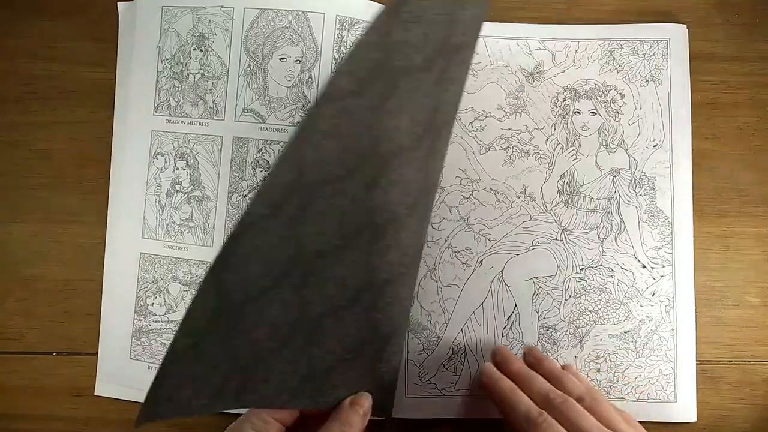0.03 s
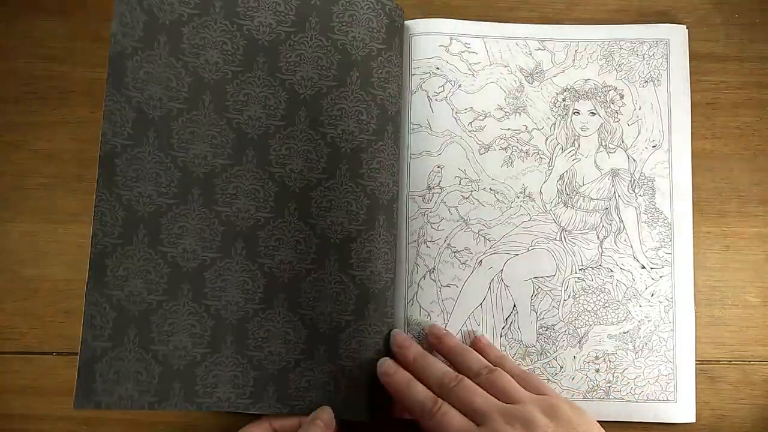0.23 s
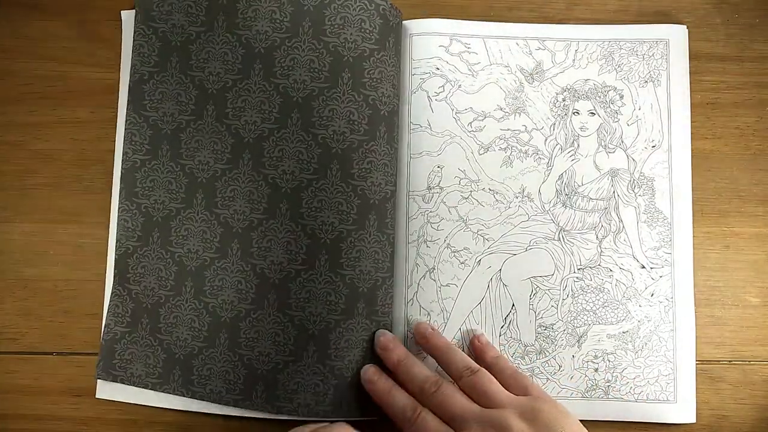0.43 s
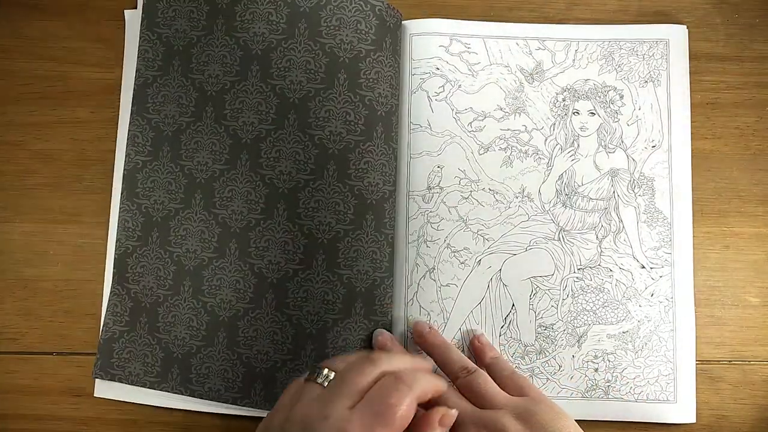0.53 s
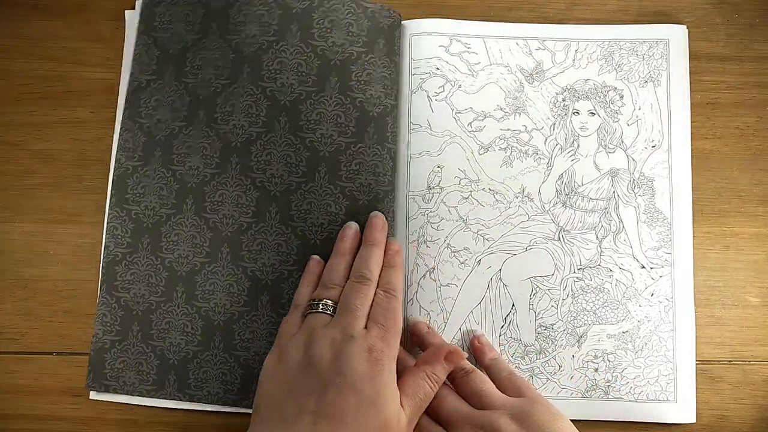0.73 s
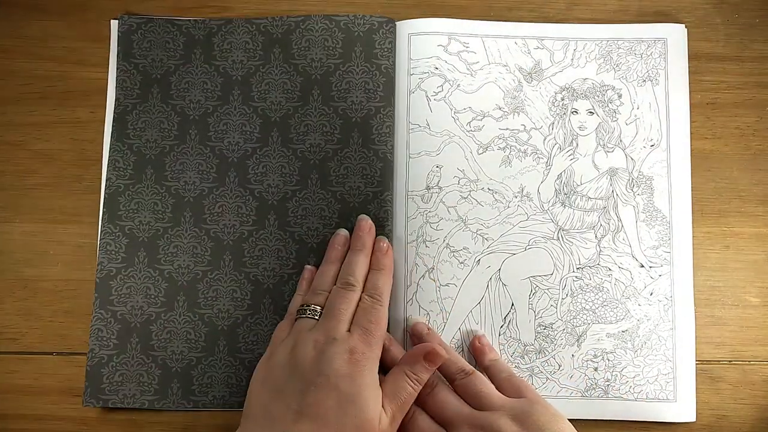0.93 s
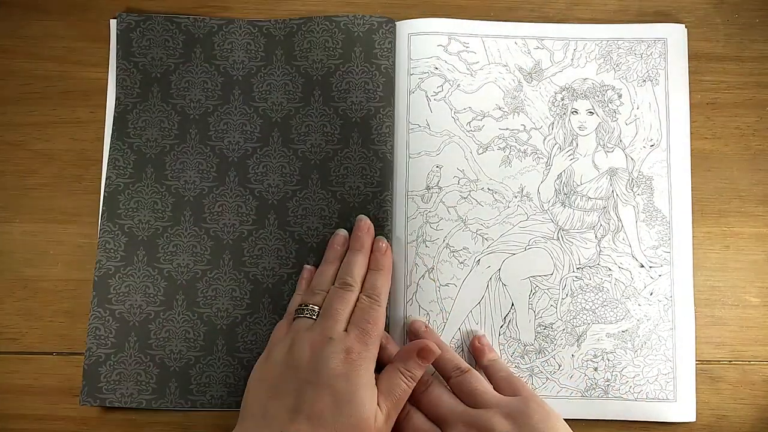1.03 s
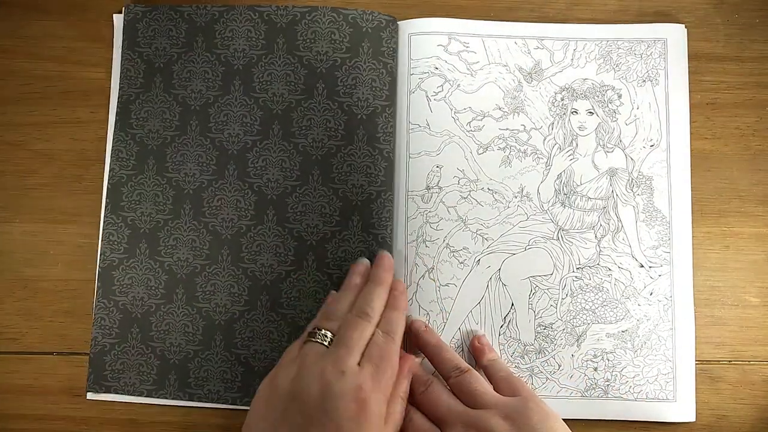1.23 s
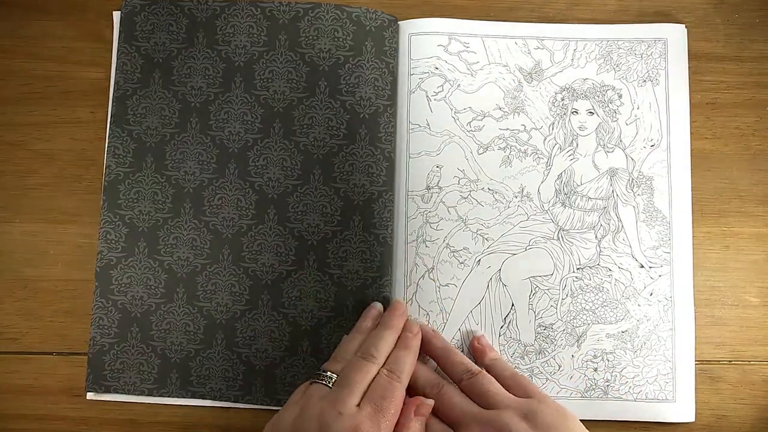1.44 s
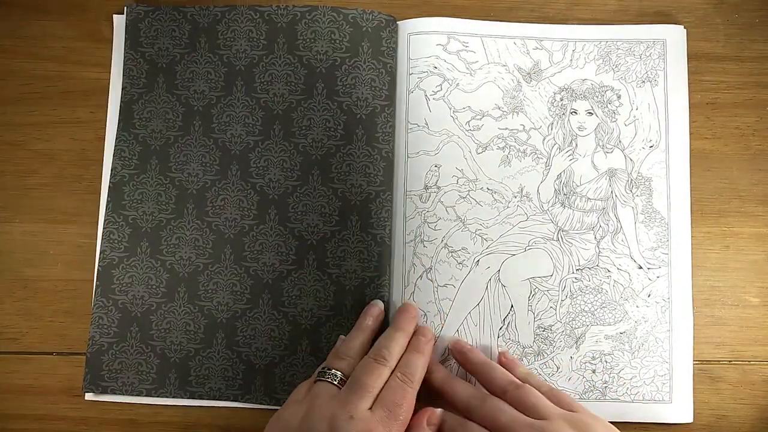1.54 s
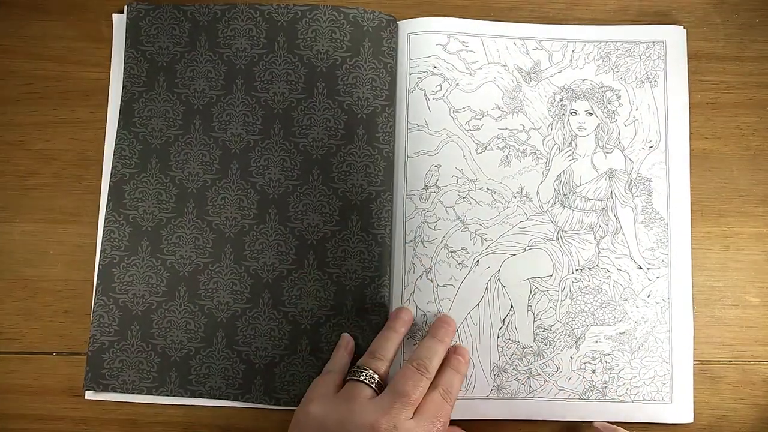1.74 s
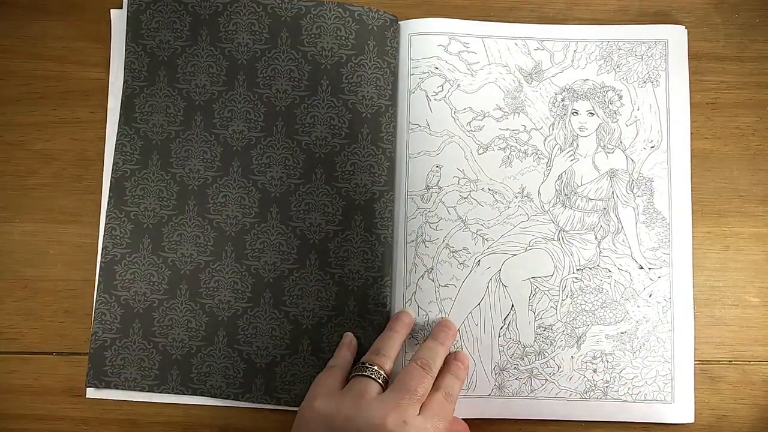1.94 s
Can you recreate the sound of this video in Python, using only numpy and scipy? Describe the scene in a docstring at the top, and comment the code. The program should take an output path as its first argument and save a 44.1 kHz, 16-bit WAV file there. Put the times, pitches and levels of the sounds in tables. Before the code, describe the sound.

Close up in a quiet room with soft steady hiss, hands turn a stiff paper page, rustling and then snapping loudly once; later a small scuff, soft taps and barely audible smoothing strokes.

```python
"""Turning a page on a desk

Hands turn a page of a large book on a wooden desk and smooth it down, close by in a quiet room.
Skin and paper slide in dense tiny slips and the bending sheet crackles, each as coloured random clicks.
The page edge snaps against the book and fingers bump it lightly: short damped rings with a broad crack.
A palm rubs dully through one resonance; noise bands that die away give the echoes of desk and walls."""
import sys
import numpy as np
from scipy import signal
from scipy.fft import rfft, irfft
from scipy.io import wavfile
from scipy.ndimage import uniform_filter1d

SR = 44100
rng = np.random.default_rng(int(sys.argv[2]) if len(sys.argv) > 2 else 0)


def digitize_waveform(pressure):
    """Quantize a signal to 16-bit integers and store it at the path in sys.argv[1].

    Rows of a 2-D input are taken as channels; values are limited to [-1, 1].
    """
    field = np.atleast_2d(pressure).T
    bounded = np.clip(field, -1, 1)
    quanta = np.round(bounded * 32767).astype(np.int16)
    wavfile.write(sys.argv[1], SR, quanta)


def gain_from_db(level_db):
    """Convert decibel levels to linear amplitude factors (20 dB per decade)."""
    decades = np.asarray(level_db, float) / 20
    return 10 ** decades


N = 88200

# Spectrum of the still room. Each row: frequency in Hz, relative density in dB per Hz.
ROOM_SPECTRUM = [(25, -32), (70, -24), (120, -16), (200, -3), (350, 3), (500, -1), (1000, -7.5), (2000, -9),
                 (3000, -9), (5000, -16.5), (6300, -23), (7800, -27), (10000, -14), (13000, -18),
                 (15700, -16.5)]
# Echoes of desk and walls. Each row: band centre in Hz, relative level in dB, 60 dB decay time in seconds.
ECHO_BANDS = [(341, -8, 0.17), (610, -12.5, 0.14), (1080, -11.5, .1), (1990, -3.5, 0.063),
              (3230, -6.5, 0.14), (5320, -6, 0.13), (10600, -6.5, 0.11)]
# Taps on the book, plus at 0.3834 s a ringing echo of the edge's snap. Each row: start in seconds, peak level
# in dB, pitch of the ring in Hz, peak of its broad crack in dB relative to the ring.
TAP_EVENTS = [(0.2031, -38.5, 442, -20), (0.2256, -31.5, 1890, -14), (0.2292, -33, 900, -14),
              (0.2373, -37, 790, -6), (0.3794, -12, 3370, 4), (.3799, -17, 3700, -25),
              (.3804, -13.5, 1122, -9), (0.3808, -19.5, 2000, 6), (0.3834, -26, 1400, -8),
              (.7436, -45.5, 4760, 2), (.7572, -38.5, 790, -5), (.8590, -35.5, 4630, -4),
              (0.8604, -34.5, 2420, -9), (.8620, -35, 1020, -13), (.953, -52.5, 700, -20),
              (1.168, -45, 1040, -2), (1.1801, -42, 1070, 0), (1.1849, -39.5, 1070, -5),
              (1.2206, -41, 980, -22), (1.441, -51, 900, 2), (1.47, -50, 3000, 0), (1.515, -50, 2500, -6),
              (1.587, -48.5, 1020, -4), (1.791, -47, 2180, 1)]
# Spectrum of the crack of stiff paper. Each row: frequency in Hz, relative density in dB per Hz.
CRACK_SPECTRUM = [(150, -39), (400, -7), (1100, -5), (2000, -8), (3400, -2.5), (5000, -6), (6300, -10),
                  (8000, -34.5), (9400, -36), (12000, -58), (16000, -67)]
# Palm dragging over the page. Each row: time in seconds, mean level of the rub in dB.
PALM_LEVEL = [(.78, -83), (.815, -65), (.85, -60), (.87, -77), (1.2, -77), (1.25, -69), (1.33, -67),
              (1.38, -76), (1.44, -71.5), (1.559, -69), (1.62, -83)]
# Hand on the page. Each row: time in seconds, then the mean levels in dB of the sliding hiss,
# the flexing sheet and the fine skin hiss.
HAND_LEVELS = [(0, -65.5, -70.5, -77), (.05, -64.5, -62, -72), (.1, -60, -60, -67),
               (0.171, -61.5, -67.5, -86), (.198, -59.5, -54.5, -71), (0.204, -44.5, -52, -56),
               (0.219, -43.5, -45.5, -59.5), (0.23, -40.5, -36, -57), (.25, -47, -51.5, -60),
               (.262, -45.5, -55, -59), (.29, -47.5, -69, -56.5), (.305, -52, -52, -62),
               (.33, -50.5, -52, -56.5), (.355, -53.5, -50.5, -71), (.372, -57, -53, -67),
               (.44, -70, -68, -72), (.6, -72.5, -70, -97), (0.739, -81.5, -73, -90),
               (.745, -55, -51.5, -66), (0.752, -54, -57, -70), (.758, -53.5, -51, -63),
               (.768, -52, -57, -66), (.776, -44.5, -56, -65), (.792, -51.5, -63, -70),
               (0.801, -70, -65.5, -78), (.83, -62.5, -69, -84), (.855, -66, -63, -72),
               (0.899, -78, -68.5, -92), (1.0, -78, -75.5, -90), (1.16, -75.5, -72.5, -88),
               (1.19, -62.5, -68, -72), (1.21, -69, -69, -76), (1.3, -64, -69, -67),
               (1.39, -68.5, -73.5, -73.5), (1.47, -61.5, -74.5, -77), (1.55, -67, -67.5, -69.5),
               (1.6, -63, -66.5, -68.5), (1.63, -70, -73.5, -72), (1.69, -67, -70, -67),
               (1.74, -73, -79, -84), (1.88, -72, -70, -84), (2, -96.5, -75.5, -88)]
# Spectrum of sliding. Each row: frequency in Hz, relative density in dB per Hz.
SLIDE_SPECTRUM = [(120, -44), (300, -17.5), (1000, -13), (2500, -9), (3800, -6), (4700, 1), (5500, -3.5),
                  (6800, -5.5), (7900, -19.5), (10000, -22.5), (15500, -33)]
# Spectrum of the flexing sheet. Each row: frequency in Hz, relative density in dB per Hz.
FLEX_SPECTRUM = [(60, -61), (150, -27.5), (300, -7.5), (500, -5), (900, 0.5), (1300, -3), (1900, -4),
                 (2700, -4.5), (4000, -14.5), (8000, -48.5)]
# Spectrum of the fine skin hiss. Each row: frequency in Hz, relative density in dB per Hz.
SKIN_SPECTRUM = [(3000, -31), (6500, -3), (7900, -7.5), (10000, 0), (12500, -1), (15500, -10)]


def colour(x, points):
    """Minimum-phase filtering: the folded cepstrum gives a causal response; the output has rms 1."""
    hz, db = np.array(points, float).T
    grid_hz = np.maximum(np.arange(2049) * SR / 4096, 1)
    magnitude = gain_from_db(np.interp(np.log(grid_hz), np.log(hz), db))
    cepstrum = irfft(np.log(magnitude))
    cepstrum[1:2048] *= 2
    cepstrum[2049:] = 0
    response = irfft(np.exp(rfft(cepstrum)))
    y = signal.fftconvolve(x, response)[:len(x)]
    return y / np.sqrt(np.mean(y ** 2))


def walk(steps_per_s):
    """Low-pass random process: held random steps, smoothed twice, wander with a spread near 1."""
    k = int(SR / steps_per_s)
    steps = np.repeat(rng.standard_normal(N // k + 1), k)
    smooth = uniform_filter1d(uniform_filter1d(steps, k), k)
    return 1.3 * smooth[:N]


def slips(per_s, spread_db):
    """Stick-slip friction as a random pulse train: independent clicks of uneven size and either sign."""
    happens = rng.random(N) < per_s / SR
    size_db = spread_db * rng.exponential(size=N)
    return happens * rng.standard_normal(N) * gain_from_db(size_db)


def still_room():
    """Stationary background noise: hiss of air and microphone, wavering slightly in level."""
    level_db, flicker_db = -66, 0.6
    hiss = colour(rng.standard_normal(N), ROOM_SPECTRUM)
    return hiss * gain_from_db(level_db + flicker_db * walk(5))


def room_tail():
    """Diffuse reverberation: the dense echoes are noise bands, each decaying exponentially."""
    delay_s = 0.0029  # half-way point of the fade-in
    t = np.arange(SR // 4) / SR
    tail = np.zeros(len(t))
    for hz, db, t60_s in ECHO_BANDS:
        sos = signal.butter(2, [hz / 1.4, hz * 1.4], "bandpass", fs=SR, output="sos")
        band = signal.sosfilt(sos, rng.standard_normal(len(t)))
        tail += gain_from_db(db) * band * np.exp(-np.log(1000) * t / t60_s)
    fade_in = np.clip(t / delay_s - 0.5, 0, 1) 
    return tail * fade_in / np.sqrt(SR / 200)


def chatter(hits):
    """Convolution with decaying treble noise: every tap is followed by a dense spray of thin repeats."""
    level_db, t60_s, above_hz, gap_s = -19, 0.025, 1860, 0.0008
    t = np.arange(1, 2048) / SR
    sos = signal.butter(2, above_hz, "highpass", fs=SR, output="sos")
    noise = signal.sosfilt(sos, rng.standard_normal(len(t)))
    spray = gain_from_db(level_db) * noise * np.exp(-np.log(1000) * t / t60_s)
    response = np.r_[1, spray * (t > gap_s)]  # the leading 1 passes the tap itself
    return signal.fftconvolve(hits, response)[:N]


def taps():
    """Impact excitation of a damped mode: a patch of paper rings for a few cycles, with a broad crack."""
    ring_cycles = 4.85  # cycles in which the decay factor falls 60 dB
    rise_cycles = 0.48  # build-up constant
    t = np.arange(2048) / SR
    out = np.zeros(N + len(t))
    impulse = 1.0 * (t == 0)
    crack = colour(impulse, CRACK_SPECTRUM)
    crack /= np.abs(crack).max()
    for start_s, peak_db, hz, crack_db in TAP_EVENTS:
        cycles = hz * t
        decay = np.exp(-np.log(1000) * cycles / ring_cycles)
        rise = (1 - np.exp(-cycles / rise_cycles)) ** 2
        ring = np.sin(2 * np.pi * cycles) * decay * rise
        blow = ring / np.abs(ring).max() + gain_from_db(crack_db) * crack
        first = int(start_s * SR)
        out[first:first + len(t)] -= gain_from_db(peak_db) * blow / np.abs(blow).max()
    return out[:N]


def palm():
    """Resonance driven by friction noise: a dull rub rings the hollow under the dragging hand."""
    centre_hz, width_hz = 900, 320  # width of one pass; two are made
    time_s, level_db = np.array(PALM_LEVEL).T
    b, a = signal.iirpeak(centre_hz, centre_hz / width_hz, fs=SR)
    once = signal.lfilter(b, a, rng.standard_normal(N))
    rub = signal.lfilter(b, a, once)
    return rub / np.std(rub) * gain_from_db(np.interp(np.arange(N) / SR, time_s, level_db))


def rustle():
    """Stick-slip friction: dense slips hiss, the bending sheet crackles coarser, skin hisses smoothly."""
    t = np.arange(N) / SR
    time_s, slide_db, flex_db, skin_db = np.array(HAND_LEVELS).T
    # slips: clicks per second, mean size in dB; each level flickers by some dB, in steps per second
    slide = colour(slips(28000, 1.2), SLIDE_SPECTRUM)
    slide *= gain_from_db(np.interp(t, time_s, slide_db) + 1.4 * walk(60.06))
    flex = colour(slips(7000, 1.9), FLEX_SPECTRUM)
    flex *= gain_from_db(np.interp(t, time_s, flex_db) + 2.86 * walk(48.95))
    skin = colour(rng.standard_normal(N), SKIN_SPECTRUM)
    skin *= gain_from_db(np.interp(t, time_s, skin_db) + 1.8 * walk(30))
    return slide + flex + skin


def scene():
    """Superposition: paper, taps and their echoes, thin in the bass, are added to the still room."""
    low_cut_hz, paper_echo_db = 153, -9
    background = still_room()
    hits = taps()
    paper = palm() + rustle()
    echoes = signal.fftconvolve(hits + gain_from_db(paper_echo_db) * paper, room_tail())[:N]
    low_cut = signal.butter(3, low_cut_hz, "highpass", fs=SR, output="sos")
    hands = signal.sosfilt(low_cut, paper + chatter(hits) + echoes)
    return (hands + background)[None]


def top_cut(x):
    """Nothing passes above the cut-off."""
    return signal.sosfilt(signal.butter(12, 16250, fs=SR, output="sos"), x)


def record(dry):
    """Signal chain: the finished mix passes through one last stage."""
    return top_cut(dry)


dry = scene()
out = record(dry)
digitize_waveform(out)
```